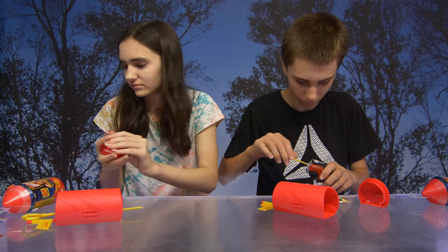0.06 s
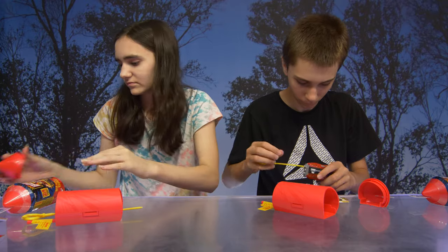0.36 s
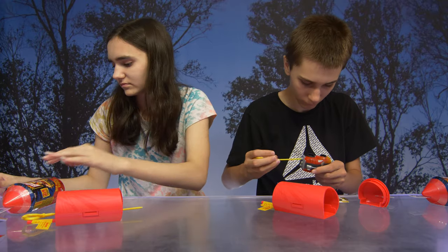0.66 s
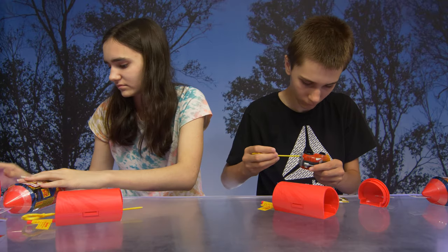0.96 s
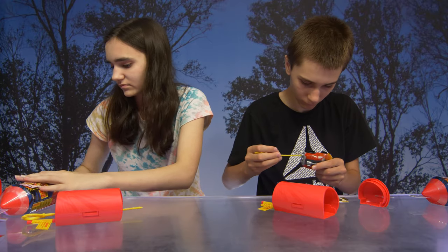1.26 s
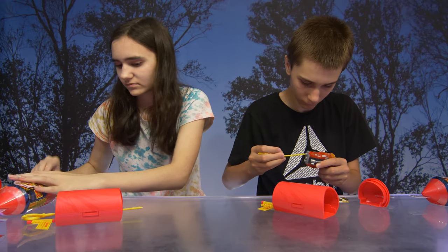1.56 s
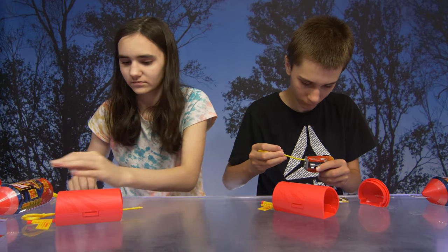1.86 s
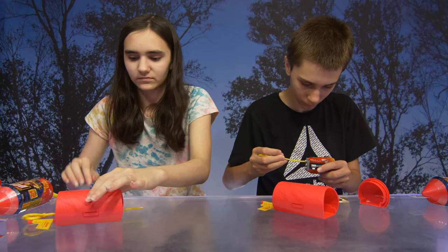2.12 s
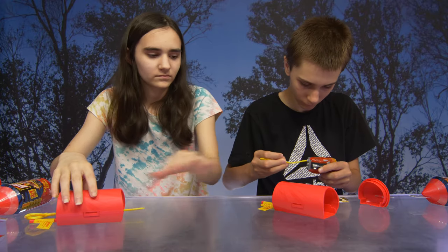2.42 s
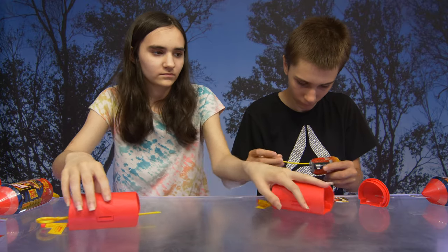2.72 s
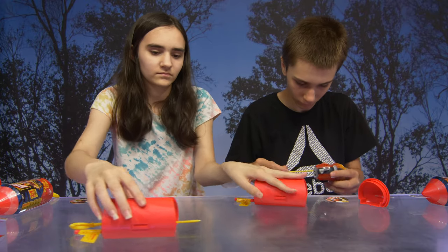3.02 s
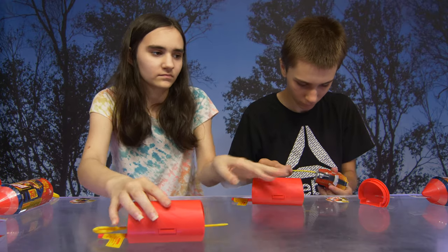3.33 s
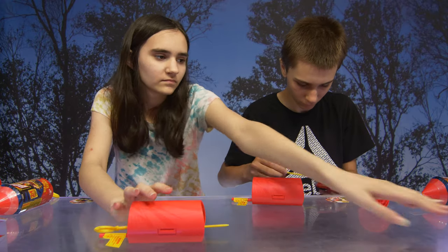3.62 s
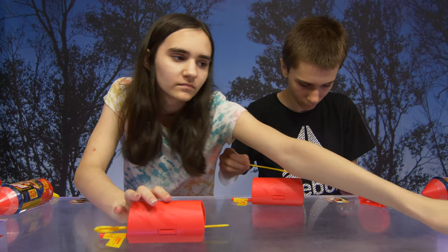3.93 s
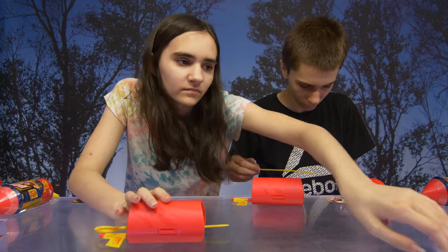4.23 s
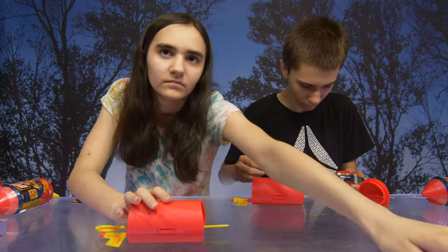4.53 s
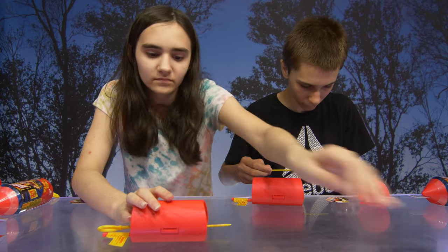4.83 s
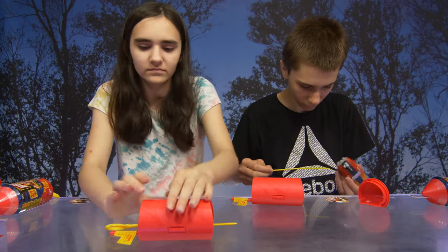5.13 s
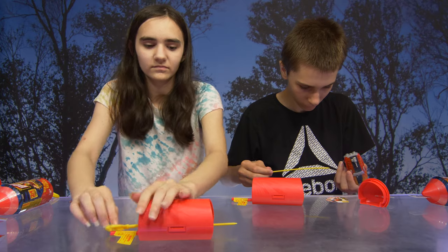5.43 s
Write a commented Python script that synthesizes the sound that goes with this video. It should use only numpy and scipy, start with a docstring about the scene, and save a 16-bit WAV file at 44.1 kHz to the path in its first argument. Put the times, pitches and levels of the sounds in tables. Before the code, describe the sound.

A hollow plastic knock, scattered taps and clicks of handled toys and a short accelerating zip, over a low ventilation rumble.

```python
"""Plastic toys on a table

Two people handle toys in a small room, over a low ventilation rumble. A hollow toy is set down and
rocks, a tube is tapped and small parts click: each impact excites damped modes. Stick-slip friction
sounds as hands brush the plastic, the tube slides and a cord is threaded through a small car.
Pulled fast, the cord's teeth strike the car's gear in an accelerating pulse train, heard as a zip."""
import sys
import numpy as np
from scipy import signal
from scipy.fft import rfft, irfft
from scipy.io import wavfile
from scipy.ndimage import uniform_filter1d

SR = 44100
rng = np.random.default_rng(int(sys.argv[2]) if len(sys.argv) > 2 else 0)


def to_wav(s):
    """Save 16-bit WAV."""
    ch = np.atleast_2d(s).T  # columns
    pcm = np.round(np.clip(ch, -1, 1) * 32767)  # PCM
    wavfile.write(sys.argv[1], SR, pcm.astype(np.int16))


N = 245620
TIME = np.arange(N) / SR

# Spectral envelopes. Each row: frequency in Hz, relative level in dB.
VENTILATION_COLOUR = [(12, -26.5), (20, -5), (50, 4), (86, -9), (123, -5), (146, -8), (357, -17),
                      (660, -25), (923, -25.5), (1190, -24.5), (2320, -39), (2750, -38), (5380, -37),
                      (6540, -68.5), (16000, -39.5)]
REVERB_COLOUR = [(80, -8), (300, 3), (1200, -4), (4000, -2.5), (9000, -4), (16000, -9.5)]
SKIN_COLOUR = [(1000, 5), (3000, -0.5), (7000, 4), (10000, 0.5), (13000, -3), (16000, -30)]
BODY_COLOUR = [(150, -15.5), (400, 2.5), (850, 2), (1300, -5), (1900, -5), (2800, -9), (6000, -16.5),
               (16000, -50.5)]  # a hollow toy under the fingers
THREAD_COLOUR = [(240, -18), (400, -8.5), (588, -13), (655, -19), (893, -7), (1350, -24), (2020, -13),
                 (2470, -1), (3370, -0.5), (5430, -3.5), (8900, -7), (13700, -18), (16000, -26)]
SLIDE_COLOUR = [(200, -16.5), (520, -14), (820, 0), (1500, -5.5), (2500, -3.5), (3800, -5.5), (4700, -9),
                (6700, -11.5), (8000, -20.5), (9500, -20), (11500, -26.5), (14000, -23.5), (16000, -43)]
ZIP_COLOUR = [(150, -79), (250, -22), (342, -4), (421, -26), (538, -20), (988, -6), (1220, -24), (1820, 0),
              (2960, -3), (5350, 2), (7060, -5.5), (9660, -2), (16000, -20)]
CAR_SHELL_COLOUR = [(150, -16), (340, -5), (430, -21), (550, 10), (750, -5), (1000, 12), (1300, -12),
                    (4000, -51)]

# Resonances. Each row: centre in Hz, bandwidth in Hz, gain of the added band in dB.
DUCT_PEAKS = [(775, 35, 8)]
CAVITY_PEAKS = [(893, 79, -13), (1050, 130, -34), (1814, 64, -4.5), (2600, 47, -10), (3500, 170, -0.5),
                (3920, 52, -37)]
CAR_PEAKS = [(570, 130, 5), (1670, 54, 3), (2580, 30, 11), (3590, 37, 3), (4630, 140, -1), (5270, 160, -6),
             (6400, 170, 0.5), (8460, 60, -12), (9050, 230, -10)]
TABLE_PEAKS = [(169.2, 24, 4.5), (374, 53, -4)]

# Modes of struck bodies. Each row: frequency in Hz, relative level in dB, T60 in seconds.
TABLE_MODES = [(77, -13, 0.49), (119, -3, 0.097), (173.6, 0.5, 0.093), (232, -5, 0.064), (355, -4.5, 0.063),
               (554, -8.5, 0.071), (618, -9, 0.028)]
EDGE_MODES = [(1150, -11, .02), (1750, -7, .016), (3500, -6, .008), (4700, -4, .006), (6100, 0, .005),
              (7500, 0, .005), (8600, -2, .005), (11800, -7, .004)]
CATCH_MODES = [(2470, 4.5, 0.03), (2750, 10, 0.034), (3170, 10, 0.019), (3800, 12, 0.0063),
               (4360, 0.5, 0.023), (4120, -5, 0.016), (4980, 4, 0.024), (7680, -11, 0.028),
               (7700, -26, 0.018)]
TUBE_MODES = [(145.6, -9.5, 0.094), (379, -13.5, 0.076), (762, 3.5, 0.027), (842, -5, 0.11),
              (1012, 0, 0.022), (1152, 1, 0.043), (1540, -1.5, 0.037), (1730, -7, 0.021), (2074, 1, 0.031),
              (2640, -43, 0.052), (3820, -7, 0.024), (3940, 7.5, 0.0091), (4730, -7, 0.026),
              (4860, -26, 0.028)]
HOLLOW_MODES = [(164.4, -16.5, 0.16), (332, -12.5, 0.063), (388, -13.5, 0.062), (558, -19, 0.22),
                (768, 5.5, 0.031), (760, -22.5, 0.19), (883, -19, 0.079), (1023, -31, 0.21),
                (1190, -2.5, 0.042), (1270, -29, 0.053), (1332, -5.5, 0.079), (1505, 1, 0.042),
                (1514, -23, 0.034), (1717, -8.5, 0.031), (2147, -11.5, 0.047)]

# Their crowded modes, merged into a wash of noise. Each row: frequency in Hz, relative level in dB.
TABLE_WASH = [(50, -9.5), (200, -8), (700, -29.5), (1500, -40), (4000, -44), (16000, -60)]
EDGE_WASH = [(200, -17.5), (1200, 8.5), (3000, 2.5), (7000, 7), (10000, -4), (16000, -12)]
CATCH_WASH = [(200, 7), (1200, 7), (1900, 4), (2800, 16.5), (4500, 2.5), (8000, 2.5), (10000, -53),
              (16000, -56)]
TUBE_WASH = [(100, -4.5), (600, 3), (1000, 10.5), (4000, 0), (6500, -18), (10000, -29), (16000, -63)]
HOLLOW_WASH = [(100, -23.5), (330, -14), (500, -12.5), (800, 2.5), (1600, 0.5), (2600, -20), (4800, -25),
               (7600, -22), (10000, -39), (16000, -50.5)]

# Strokes of skin. Each row: centre and length in seconds, relative hiss and body levels in dB.
BRUSHES = [(0.051, 0.0099, -52, -70), (0.187, 0.03, -57, -85), (0.375, 0.038, -59.5, -79),
           (0.604, 0.036, -57, -34.5), (0.762, 0.034, -60, -48), (.87, 0.057, -90, -64.5),
           (1.233, .05, -61.5, -59), (1.526, 0.11, -65, -52), (1.682, 0.034, -69, -57),
           (1.844, 0.028, -55, -66), (1.929, .03, -43, -67), (2.187, 0.054, -83, -61.5),
           (2.37, 0.015, -62, -76), (3.503, 0.041, -63, -74), (3.735, 0.13, -69, -44.5),
           (4.165, 0.79, -70, -56), (4.4, 0.035, -65, -83), (4.649, 0.043, -73, -44),
           (4.765, 0.043, -62, -50), (4.849, 0.053, -78, -48.5), (4.983, .13, -68, -50),
           (5.201, 0.16, -55, -58.5), (5.445, 0.15, -65.5, -58)]
# Plastic dragging on plastic or skin. Each row: centre and length in seconds, start and end pitch
# in Hz, relative level in dB.
SQUEAKS = [(0.189, 0.033, 1350, 1760, -50.5), (0.317, 0.057, 2380, 2130, -61.5),
           (1.218, 0.079, 1650, 1800, -58.5), (2.996, 0.16, 4140, 4080, -45.5),
           (3.111, 0.012, 5200, 5330, -48), (3.144, 0.11, 4070, 3420, -45),
           (4.115, 0.071, 3600, 3260, -47.5), (4.208, 0.066, 3730, 3110, -47),
           (4.088, 0.02, 11000, 11500, -53), (4.296, 0.25, 9340, 8600, -53.5),
           (4.312, 0.095, 3000, 2630, -57), (4.394, 0.065, 3480, 2930, -53),
           (4.438, 0.006, 9070, 8800, -39.5), (4.656, 0.034, 3100, 3100, -51.5)]
# Pushes of the tube, the last a brief catch of the rim. Each row: start, attack, hold and release
# in seconds, relative level in dB.
SLIDES = [(2.481, 0.3, 0.043, 0.27, -42), (2.832, .18, 0.19, 0.24, -42), (3.106, .003, .008, 0.037, -42.5)]
# Spells of rattling after a jolt or a shift of grip. Each row: start and end in seconds, mean level in dB.
RATTLES = [(0.521, 0.586, -39), (1.46, 1.7, -49), (4.608, 4.792, -48), (4.82, 5.02, -47)]

# Impacts. Each row: start in seconds, relative level in dB, bass gain in dB, treble gain in dB.
TABLE_THUDS = [(.512, -26, 1, -0.5), (1.902, -19.5, -13, 2.5), (1.9065, -23, -2, 0), (1.912, -30, 1, 4),
               (2.44, -29, 8, 10), (2.675, -39, 5, -2), (3.533, -36.5, 18, -4), (5.175, -33.5, 18, 5)]
EDGE_TICKS = [(.0495, -26.5, 2, -1.5), (.063, -23.5, -2, 2.5), (.0665, -33.5, 10, -1),
              (.0812, -31.5, -1, 1), (.7575, -25, 17, 3), (1.887, -40, 10, 15.5), (1.9278, -32.5, -0.5, 13),
              (2.350, -31, 13, 20), (3.5554, -36, -12, -4.5), (3.6128, -32, -37, -7),
              (3.6642, -38, -27, -17), (3.7375, -31, -11, -10), (3.7688, -26, -6, 9), (3.775, -37, 3, 2),
              (4.702, -44, 0, 3)]
CATCH_CLICKS = [(0.589, -25.5, 13, 18), (0.5943, -28, 0, -14), (0.6, -40, 8, 8), (0.9732, -23, 16.5, -1.5),
                (1.0219, -26.5, 14, 3), (3.978, -32, 4, 9), (3.986, -31, 6, -22), (4.0279, -31, 12, 8),
                (4.1, -45, 0, 10), (4.4845, -19, -10.5, 6.5), (4.5933, -28, 4, 1), (4.649, -33, -3, -23),
                (4.6575, -33, -2, -15), (4.676, -34, -2, -14), (4.852, -35, 10, 0), (4.937, -38, 17, 5)]
TUBE_TAPS = [(1.8775, -25.5, 11, 21), (2.4125, -30, 20.5, -7.5), (2.4325, -26, -5, -30),
             (2.4385, -29.5, 8, 27), (2.443, -23.5, -16, -31), (2.459, -28, -4, -49), (2.661, -26, 30, -8),
             (2.6638, -18.5, 9, 3), (2.6752, -9.5, -2, 7), (3.111, -28, -30, 3), (3.1157, -27.5, -26, 3),
             (3.470, -41, 5, -17), (3.4896, -34, -2, 16), (4.5935, -31, 2, 5), (4.6325, -35, 4, 12),
             (4.7337, -34, 5, 6), (5.389, -39, 15, -34), (5.407, -46, 3, 20), (5.4297, -27.5, 3, 9),
             (5.434, -29, -25, -8), (5.559, -37.5, 18, -23)]
HOLLOW_KNOCKS = [(.5082, -2, -1.5, 1.5), (.5135, -10.5, -1.5, -10), (.6248, -15.5, -5.5, -3),
                 (.938, -32.5, 13, -3), (.9524, -19, -15, -12), (.9585, -19.5, -9, -3), (.982, -19, -12, 2),
                 (.990, -20, -1, -21), (1.0142, -24, -16, -1), (1.020, -23, -4, -6),
                 (1.0287, -19.5, 3.5, 4.5), (1.040, -28, -6, 7), (1.504, -33, 8, 2), (1.601, -31.5, -9, -6),
                 (5.177, -35, 7, 8), (5.188, -31.5, 2, 6)]


def undb(db):
    """Amplitude ratio of a level in decibels."""
    return 10 ** (np.asarray(db) / 20)


def unit(x):
    """Normalisation to an rms of 1."""
    return x / np.sqrt(np.mean(x ** 2))


def colour(x, points, size=2048):
    """Minimum-phase filtering through (Hz, dB) points: folding the cepstrum makes it causal."""
    hz, db = np.transpose(points)
    bins = np.maximum(np.fft.rfftfreq(size, 1 / SR), 1)
    gain = undb(np.interp(np.log(bins), np.log(hz), db))
    cepstrum = irfft(np.log(gain))
    cepstrum[1:size // 2] *= 2
    cepstrum[size // 2 + 1:] = 0
    response = irfft(np.exp(rfft(cepstrum)))
    return signal.fftconvolve(x, response)[:len(x)]


def resonate(x, peaks):
    """Forced resonance: each peak adds a narrow band of the input to itself."""
    return x + sum(undb(db) * signal.lfilter(*signal.iirpeak(hz, hz / width, fs=SR), x)
                   for hz, width, db in peaks)


def fade(t, t60):
    """Exponential damping, 60 dB down after t60 seconds."""
    return np.exp(-np.log(1000) * t / t60)


def walk(rate):
    """Slow random modulation of rms 1, with rate new values a second."""
    steps = rng.standard_normal(4096)
    return unit(np.interp(TIME * rate, np.arange(len(steps)), steps))


def grains(rate, spread_db):
    """Friction as shot noise: on average rate tiny slips a second, of uneven size."""
    happens = rng.random(N) < rate / SR
    size = undb(spread_db * np.clip(rng.standard_normal(N), -2, 2))
    return unit(happens * size * rng.choice([-1, 1], N))


def push(start, attack, hold, release):
    """Trapezoidal speed of a hand, 0 to 1: it gathers pace, holds it and slows to a stop."""
    return np.interp(TIME, start + np.cumsum([0, attack, hold, release]), [0, 1, 1, 0])


def swell(centre, length):
    """Raised-cosine envelope, above half height for length seconds."""
    return np.cos(np.pi / 2 * np.clip((TIME - centre) / length, -1, 1)) ** 2


def impacts(events, modes, wash, wash_db, wash_t60, detune):
    """Modal superposition: a blow rings damped sines and a noise wash; contact sets bass and treble."""
    out = np.zeros(N + SR)
    t = TIME[:SR // 4]
    hz, mode_db, t60 = np.array(modes).T[:, :, None]
    for start_s, level_db, bass_db, treble_db in events:
        pitch = hz * (1 + detune * rng.standard_normal(hz.shape))  # the grip shifts the modes
        phase = 1.15 * rng.standard_normal(hz.shape)  # roughly in step, for a sharp attack
        ring = np.sum(undb(mode_db) * np.sin(2 * np.pi * pitch * t + phase) * fade(t, t60), axis=0)
        ring *= 1 - fade(t, 2 / np.max(hz))  # contact lasts about a cycle of the highest mode
        crack = colour(rng.standard_normal(len(t)) * fade(t, wash_t60), wash)
        blow = unit(ring) + undb(wash_db) * unit(crack)
        blow = colour(blow, [(250, bass_db), (1800, 0.022), (2500, 0.0039), (8000, treble_db)])
        power = uniform_filter1d(blow ** 2, size=130, mode="constant")
        peak = 2.59 * np.sqrt(np.max(power))
        start = int(start_s * SR)
        out[start:start + len(t)] += undb(level_db) * blow / peak
    return out[:N]


def ventilation(level_db=-53.5, wander_db=1.3):
    """Broadband flow noise: a rumble and faint hiss with one weak duct resonance."""
    air = resonate(rng.standard_normal(N), DUCT_PEAKS)
    air = colour(air, VENTILATION_COLOUR, size=8192)
    return unit(air) * undb(level_db + wander_db * walk(2.3))


def reverberate(x, wet_db=-5.5, low_t60=0.31, high_t60=0.28, split_hz=870, gap_s=0.0013):
    """Diffuse reverberation: reflections from the table and close walls decay, the treble first."""
    t = TIME[:SR // 2]
    noise = rng.standard_normal(len(t))
    low = signal.sosfilt(signal.butter(1, split_hz, fs=SR, output="sos"), noise)
    tail = low * fade(t, low_t60) + (noise - low) * fade(t, high_t60)
    tail *= np.clip(t / gap_s - 1, 0, 1)  # reflections arrive after the direct sound
    tail = colour(tail / np.sqrt(np.sum(tail ** 2)), REVERB_COLOUR)
    return x + undb(wet_db) * signal.fftconvolve(x, tail)[:N]


def brushing_hands():
    """Friction noise: skin hisses over plastic while coarser slips drive the hollow body under it."""
    hiss = unit(colour(grains(rate=6000, spread_db=3), SKIN_COLOUR))
    coarse_slips = grains(rate=900, spread_db=4.5)
    body = unit(colour(resonate(coarse_slips, CAVITY_PEAKS), BODY_COLOUR))
    fidget = undb(5.5 * walk(9)) * (undb(-68.5) * hiss + undb(-67) * body)  # fingers never quite rest
    return fidget + sum(swell(centre, length) * (undb(hiss_db) * hiss + undb(body_db) * body)
                        for centre, length, hiss_db, body_db in BRUSHES)


def squeaks(waver=0.0362, waver_hz=130, flutter_db=4):
    """Irregular stick-slip oscillation: a ragged pitch glides, swells and dies."""
    ragged = walk(900)
    grip = undb(flutter_db * walk(160))
    out = np.zeros(N)
    for centre, length, start_hz, end_hz, db in SQUEAKS:
        near = np.abs(TIME - centre) < length
        progress = (TIME[near] - centre) / length + 0.5
        glide_hz = start_hz + (end_hz - start_hz) * progress
        hz = glide_hz + (waver_hz + waver * glide_hz) * ragged[near]
        tone = np.sin(2 * np.pi * np.cumsum(hz) / SR)
        out[near] += undb(db) * swell(centre, length)[near] * grip[near] * tone
    return out


def threading_cord():
    """Stick-slip friction: the cord catches in its slot, with an amplitude proportional to speed."""
    slips = grains(rate=1800, spread_db=1) * undb(2.7 * walk(80))
    speed = push(start=4.003, attack=0.055, hold=0.29, release=0.27)
    return unit(colour(slips, THREAD_COLOUR)) * undb(-47) * speed


def sliding_tube():
    """Cavity resonance, driven by fine slips of the tube's rim over the table top."""
    slips = grains(rate=9000, spread_db=2) * undb(0.67 * walk(60))
    force = sum(undb(db) * push(*timing) for *timing, db in SLIDES)
    return unit(colour(resonate(slips, CAVITY_PEAKS), SLIDE_COLOUR)) * force


def zipping_cord(start_s=3.62, exit_s=3.856, doubling_s=0.075, exit_teeth_per_s=350, db_per_doubling=9):
    """Pulse-train excitation: teeth snap past the gear ever faster and louder until the cord leaves."""
    doublings = (np.clip(TIME, start_s, exit_s) - exit_s) / doubling_s
    rate = exit_teeth_per_s * 2 ** doublings
    coast_s = np.maximum(TIME - exit_s, 0)
    force_db = -22.5 + db_per_doubling * doublings - 6.5 * (coast_s > 0)  # the freed gear is quieter
    force = undb(force_db) * fade(coast_s, t60=0.093) * (TIME > start_s)
    teeth_passed = np.cumsum(rate * (1 + 0.092 * walk(90))) / SR
    since_snap_s = teeth_passed % 1 / rate
    snaps = fade(since_snap_s, t60=0.013) + 0.22  # the cord keeps rubbing between snaps
    snaps /= np.sqrt(uniform_filter1d(snaps ** 2, size=1100))  # equal power at any tooth rate
    teeth = snaps * undb(1.8 * walk(170)) * grains(rate=14000, spread_db=0.5)
    rasp = unit(colour(resonate(teeth, CAR_PEAKS), ZIP_COLOUR))
    shell = unit(colour(teeth, CAR_SHELL_COLOUR)) * np.minimum(140 / rate, 1)  # slow teeth shake it most
    return (rasp + undb(-10) * shell) * force


def thudding_table():
    """Soft impacts of a hand, forearm or toy excite the low modes of the table."""
    return impacts(TABLE_THUDS, TABLE_MODES, TABLE_WASH, wash_db=-4, wash_t60=0.093, detune=0.023)


def ticking_edges():
    """Hard, brief contacts of nails and thin edges give a broad, noisy spectrum."""
    return impacts(EDGE_TICKS, EDGE_MODES, EDGE_WASH, wash_db=7, wash_t60=0.033, detune=0.038)


def clicking_parts(clicks_per_rattle=7, bass_db=8, treble_db=11, spread_db=5):
    """Small, stiff parts have high natural frequencies; they click into place or rattle at random."""
    clicks = list(CATCH_CLICKS)
    for start, end, db in RATTLES:
        scatter_db = spread_db * rng.standard_normal((clicks_per_rattle, 3))
        levels = np.array([db, bass_db, treble_db]) + scatter_db
        moments = rng.uniform(start, end, clicks_per_rattle)
        clicks.extend(np.column_stack([moments, levels]))
    return impacts(clicks, CATCH_MODES, CATCH_WASH, wash_db=-4, wash_t60=0.012, detune=0.011)


def on_table(x, cutoff_hz=147):
    """A body much smaller than the wavelength radiates little bass; the table top resonates under it."""
    radiated = signal.sosfilt(signal.butter(2, cutoff_hz, "high", fs=SR, output="sos"), x)
    return resonate(radiated, TABLE_PEAKS)


def tapping_tube():
    """Impulse response of the tube: its modes ring briefly as it is tapped and tipped on the table."""
    return impacts(TUBE_TAPS, TUBE_MODES, TUBE_WASH, wash_db=1, wash_t60=0.024, detune=0.033)


def knocking_toy():
    """Free vibration of a shell: the hollow toy rings at each contact as it is set down and rocks."""
    return impacts(HOLLOW_KNOCKS, HOLLOW_MODES, HOLLOW_WASH, wash_db=-4.5, wash_t60=0.032, detune=0.005)


def scene():
    """Superposition: impacts and friction reverberate in the room, over the ventilation."""
    toys = on_table(knocking_toy() + tapping_tube())
    blows = toys + clicking_parts() + ticking_edges() + thudding_table()
    friction = sliding_tube() + zipping_cord() + threading_cord() + squeaks() + brushing_hands()
    heard = reverberate(blows + undb(-3) * friction)
    return (heard + ventilation())[None]


def record(dry, low_hz=16, top_hz=16000):
    """Band limiting removes the deepest rumble and the highest treble."""
    sound = signal.sosfilt(signal.butter(2, low_hz, "high", fs=SR, output="sos"), dry)
    return signal.sosfilt(signal.ellip(10, 0.1, 80, top_hz, fs=SR, output="sos"), sound)


dry = scene()
out = record(dry)
to_wav(out)
```